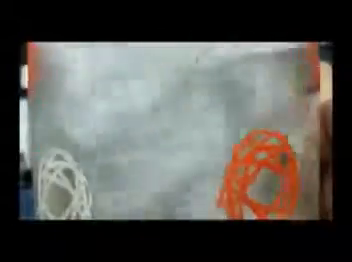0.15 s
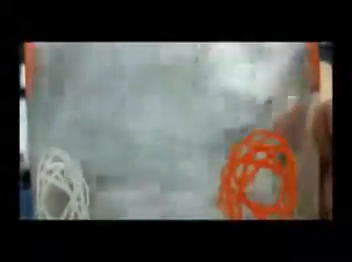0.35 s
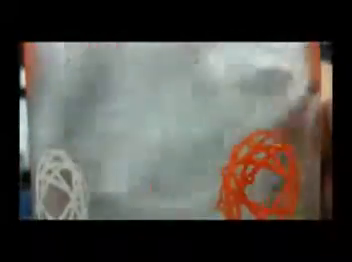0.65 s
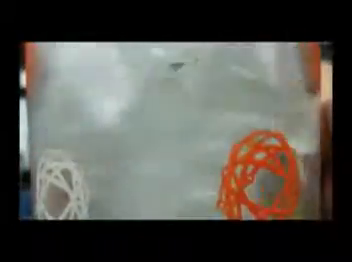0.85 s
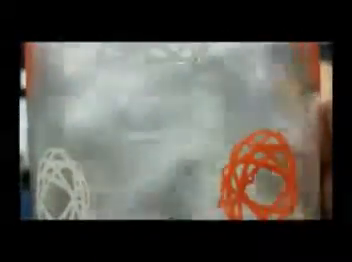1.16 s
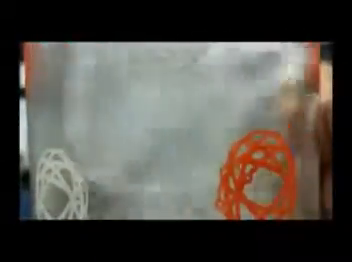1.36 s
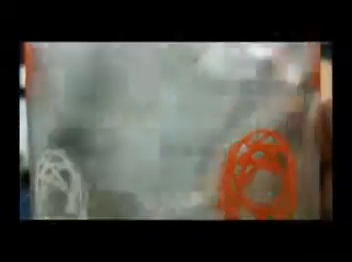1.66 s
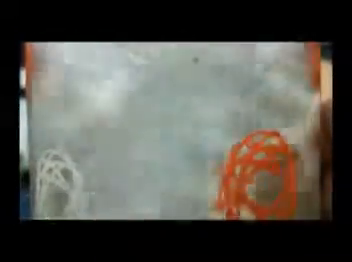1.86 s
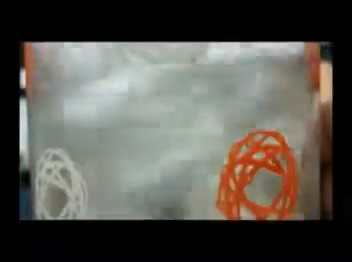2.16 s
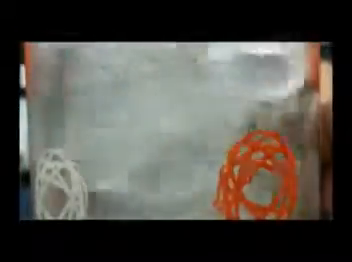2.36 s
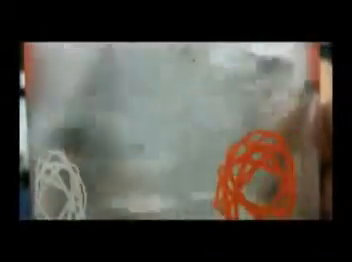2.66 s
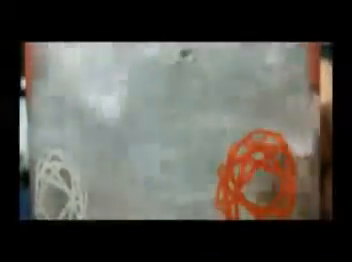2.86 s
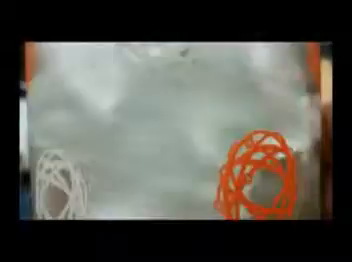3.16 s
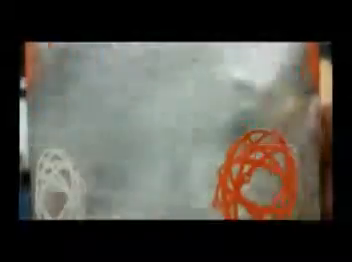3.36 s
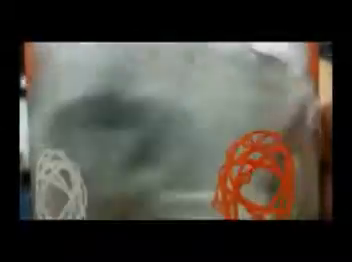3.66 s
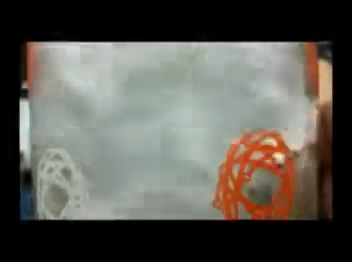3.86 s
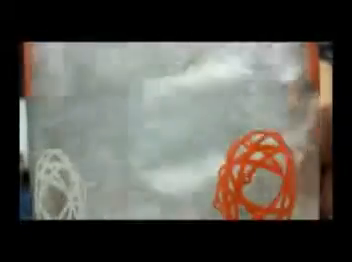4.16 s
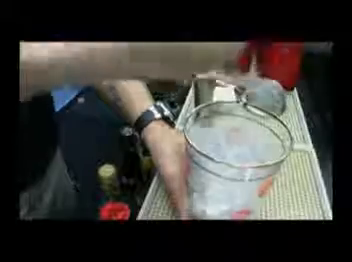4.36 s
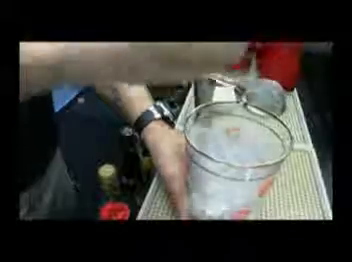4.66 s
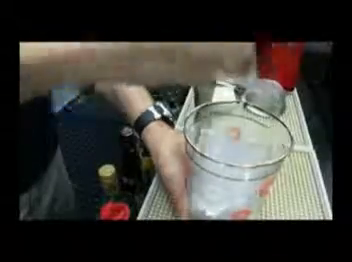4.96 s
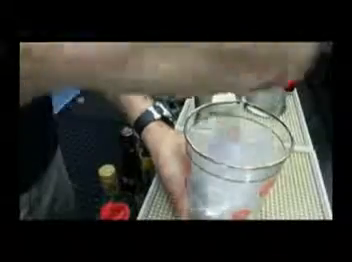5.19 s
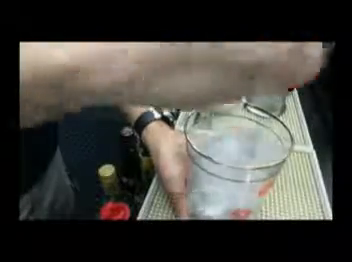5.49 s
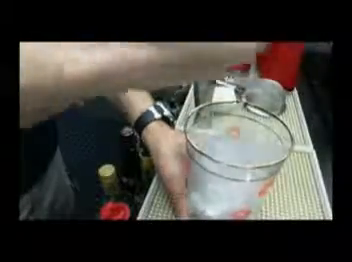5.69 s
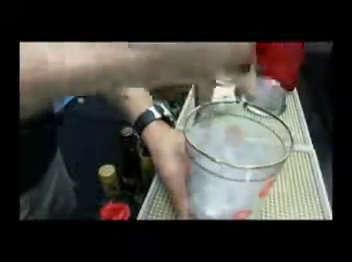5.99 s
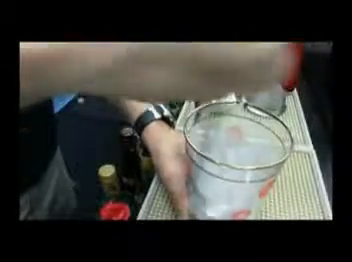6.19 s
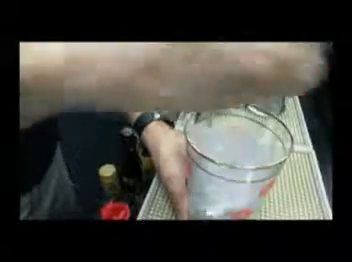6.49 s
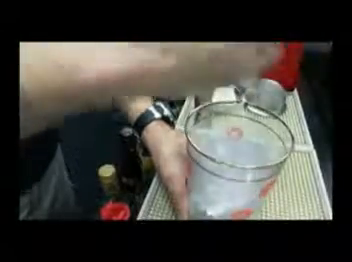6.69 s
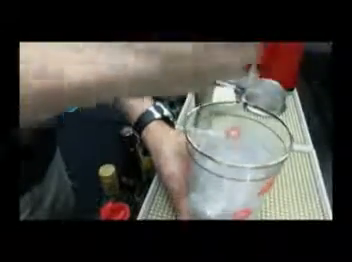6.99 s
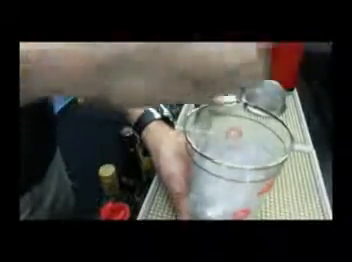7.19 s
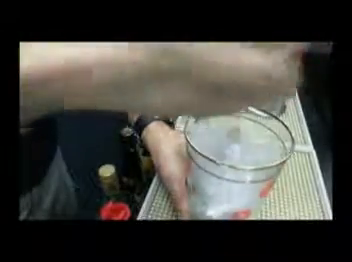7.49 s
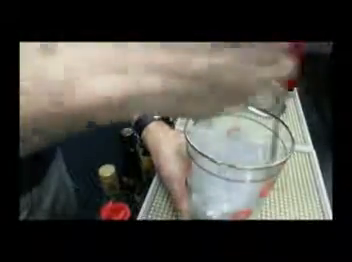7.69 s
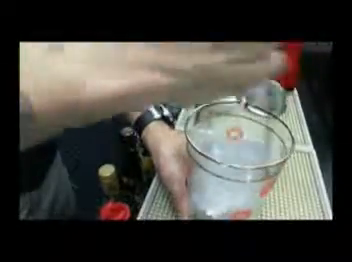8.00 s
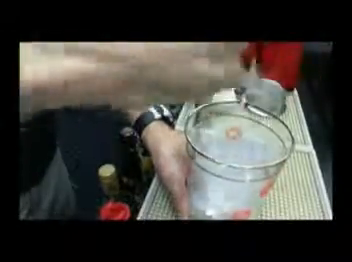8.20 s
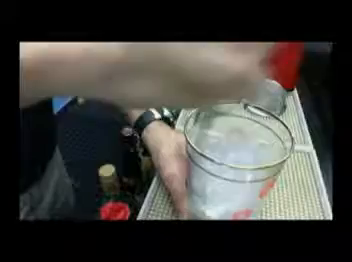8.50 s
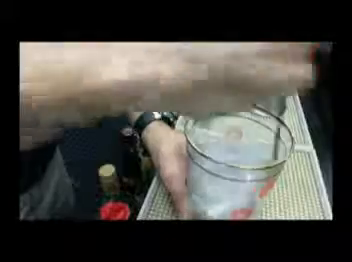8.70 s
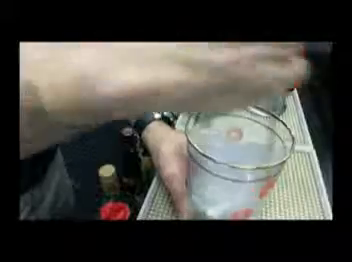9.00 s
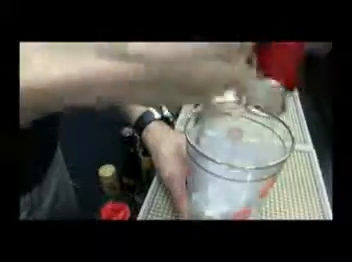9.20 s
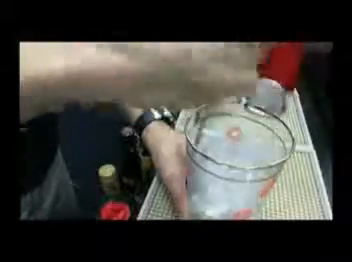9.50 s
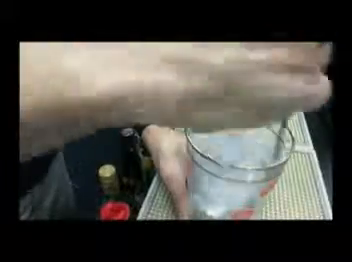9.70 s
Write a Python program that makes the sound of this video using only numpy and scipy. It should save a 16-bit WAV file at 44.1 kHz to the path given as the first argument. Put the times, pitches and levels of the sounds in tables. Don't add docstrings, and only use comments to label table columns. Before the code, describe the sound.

From 0 to about 4.2 seconds, ice is stirred briskly in a tall mixing glass right beside a small microphone. Sharp, bright cracks come in crowded clusters, roughly two bursts each second, over continuous fine wet rattling, hollow glass thuds and a low slosh of liquid. The hardest hits distort and sound flattened; a heavy cluster lands around 4.1 to 4.2. A blink of silence follows at about 4.26, then a loud clipped crack as the sound resumes from farther off at 4.3. The stirring is now quieter and slower, with more short, hard room reverberation and a steady low counter hum. Clear single cracks stand out near 5.0, 5.7, 7.0, 8.5 and 9.5 among faint ticks and dull taps. A deep sway swells at 5.4 and fades, returning weaker at 8.2. Stirring continues to the end, near 10 seconds.

```python
import sys
import numpy as np
from scipy import signal
from scipy.fft import rfft, irfft
from scipy.io import wavfile
from scipy.ndimage import uniform_filter1d

SR = 44100
rng = np.random.default_rng(int(sys.argv[2]) if len(sys.argv) > 2 else 0)


def to_linear_factor(level_db):
    exponent = np.asarray(level_db, float) / 20
    return 10 ** exponent


def store_pcm(level_fs):
    pcm = np.round(np.clip(level_fs, -1, 1) * 32767).astype(np.int16)
    wavfile.write(sys.argv[1], SR, np.atleast_2d(pcm).T)


N = 434385

# start_s, end_s
CHANGE = (4.2568, 4.3162)


def evened(x):
    return x / np.sqrt(np.mean(x ** 2) + 1e-20)


def read(points, hz):
    point_hz, value = np.transpose(points)
    return np.interp(np.log(hz + 1), np.log(point_hz + 1), value)


def colour(points, size=2048):
    gain_db = read(points, abs(np.fft.fftfreq(size, 1 / SR)))
    log_gain = np.log(to_linear_factor(np.maximum(gain_db, -100)))
    return np.fft.ifft(np.exp(np.conj(signal.hilbert(log_gain)))).real[:size // 2]


def ring(x, hz, width):
    r = np.exp(-np.pi * width / SR)
    angle = 2 * np.pi * hz / SR
    return signal.lfilter([np.sin(angle)], [1, -2 * r * np.cos(angle), r * r], x)


def counter():
    # start_s, level_db, decay_db_per_s
    jolts = [
        (4.32, -50.5, 44),
        (5.36, -28.5, 14),
        (8.19, -36.5, 13),
        (9.25, -47, 10),
    ]
    # mode_hz, width_hz, level_db
    modes = [
        (133, 5.2, -48),
        (172.3, 4.5, -46),
        (235.5, 9, -47.5),
    ]
    sway_hz, rise_s, stop_s = 33.7, 0.035, 1.4
    t = np.arange(N) / SR
    after = t > CHANGE[1]
    sway = to_linear_factor(-41.5) * after
    for s, db, dying_db in jolts:
        gate = np.clip(np.minimum(t - s, s + stop_s - t) / rise_s, 0, 1)
        sway = sway + to_linear_factor(db - dying_db * abs(t - s)) * gate
    murmur = sum(to_linear_factor(db) * evened(ring(rng.standard_normal(N), hz, width)) for hz, width, db in modes)
    return sway * np.sqrt(2) * np.sin(2 * np.pi * sway_hz * t) + murmur * after


def stir_db():
    # start_s, level_db
    vigour = [(0.0, -36), (1.07, -34), (1.18, -38), (1.48, -32), (1.97, -34), (2.14, -33.5), (4.03, -35),
              (4.39, -36.5), (5.16, -38.5), (7.3, -41.5), (8.61, -39.5), (9.03, -40), (9.85, -39)]
    s, db = np.transpose(vigour)
    return np.interp(np.arange(N) / SR, s, db)


def slosh_db():
    vigour_db = stir_db()
    far_db = -6 * (np.arange(N) > CHANGE[1] * SR)
    return -23.5 + 0.69 * (vigour_db - vigour_db[0]) + far_db


def slosh():
    # frequency_hz, density_db
    spectrum = [(12, -42), (20, -25), (34, -3), (49, -1.5), (76, -10.5), (487, -15), (608, -65), (776, -18),
                (4000, -37), (5200, -74), (8800, -120)]
    gain = to_linear_factor(read(spectrum, np.fft.rfftfreq(N + 1, 1 / SR)))
    wash = evened(irfft(rfft(rng.standard_normal(N + 1)) * gain)[:N])
    deep = signal.filtfilt(*signal.butter(2, 80, fs=SR), wash)
    far = np.arange(N) > CHANGE[0] * SR
    return to_linear_factor(slosh_db() - 10.0) * (wash - 0.68 * deep * far)


def tail(size=16000):
    # frequency_hz, t60_s
    decay = [
        (300, 0.3),
        (2500, 0.71),
        (5000, 0.14),
        (14000, 0.42),
    ]
    taps = np.zeros(size)
    at = np.arange(130, size - 20, 12)
    taps[at + rng.integers(0, 12, len(at))] = rng.choice([-1., 1.], len(at))
    hz, t, z = signal.stft(taps, SR, nperseg=256)
    dull = to_linear_factor(-8.0 * (hz < 4200))[:, None]
    fade = to_linear_factor(-60 * t / read(decay, hz)[:, None])
    faded = signal.istft(z * dull * fade, SR, nperseg=256)[1]
    return faded / np.linalg.norm(faded)


def room(x):
    turn = np.arange(N) / SR / 0.13
    wet = np.zeros(N)
    for k in range(3):
        share = np.cos(np.pi / 2 * np.minimum(abs((turn - k) % 3 - 1.5), 1))
        wet += signal.fftconvolve(x * share, tail())[:N]
    return wet


def glass(pushes):
    # mode_hz, width_hz, level_db
    modes = [
        (277, 360, 2.5),
        (618.6, 48, -2.5),
        (1516, 230, -1),
        (2074, 41, -17),
        (2260, 1900, -1),
    ]
    change = round(CHANGE[1] * SR)
    takes = []
    for part, pitch in ((pushes[:change], 1), (pushes[change:], 0.975)):
        rung = np.zeros(len(part))
        for k, (hz, width, db) in enumerate(modes):
            rung += (-1) ** k * to_linear_factor(db) * ring(part, hz * pitch, width * pitch ** 8)
        takes.append(rung)
    thud = signal.lfilter(*signal.butter(2, (130, 1700), "band", fs=SR), pushes)
    return np.concatenate(takes) + to_linear_factor(16.5) * thud


def crack_walls():
    # frequency_hz, level_db
    near = [(710, -14), (1200, -11), (1610, -20.5), (1730, -9.5), (2000, -4), (2230, -10.5), (2530, -3),
            (3320, -9.5), (5530, 1.5), (6440, -5), (8910, -0.5), (10100, -6.5), (11700, 0), (14400, -11.5),
            (16000, -27.5)]
    # frequency_hz, level_db
    distant = [(710, -16.5), (1500, -13), (2400, -5.5), (3400, -7), (4700, -0.5), (6000, -3.5), (7900, 0.5),
               (10000, -5), (12000, -2), (14400, -11), (16000, -41)]
    return colour(near), colour(distant)


def rattle(struck, per_s=450., spread_db=4.5, follow=0.32):
    busy = uniform_filter1d(uniform_filter1d(struck ** 2, 1500), 1500, origin=700)
    usual = abs(uniform_filter1d(busy, 30000))
    busy = evened(((abs(busy) + 1e-5) / (usual + 1e-5)) ** (follow / 2))
    drift = uniform_filter1d(uniform_filter1d(rng.standard_normal(N), 900), 900)
    clumps = to_linear_factor(2.5 * evened(drift))
    contact = rng.random(N) < per_s / SR
    size = clumps * to_linear_factor(spread_db * np.minimum(rng.exponential(1, N), 2)) * contact

    far = np.arange(N) > CHANGE[0] * SR
    walls = crack_walls()
    cube = rng.integers(0, 40, N) + 40 * far
    kinds = [crack(hz, 0.0018, wall, focus_db=12.0)
             for wall in walls for hz in np.geomspace(1900, 12500, num=40)]
    ticks = np.zeros(N + 1500)
    for at in np.flatnonzero(size):
        ticks[at:at + 1500] += size[at] * kinds[cube[at]]

    near_hiss, far_hiss = [signal.oaconvolve(rng.standard_normal(N), wall)[:N] for wall in walls]
    hiss = np.where(far, far_hiss, near_hiss)
    soft = uniform_filter1d(size, 60) * rng.standard_normal(N)
    bumps = glass(signal.lfilter(*signal.butter(2, 900, fs=SR), soft))
    fine = to_linear_factor(stir_db()) * (to_linear_factor(2.0) * busy * evened(ticks[:N]) + to_linear_factor(-13.0) * evened(hiss))
    return fine + busy * to_linear_factor(slosh_db() - 4.5) * evened(bumps)


def knocks():
    # start_s, level_db, thud_hz
    wall_knocks = [(.0346, -7, 1680), (.189, -5.5, 1070), (.4992, -13.5, 680), (.891, -17, 1450),
                   (1.1048, -10, 1390), (1.1457, -16.5, 1370), (1.2158, -18, 560), (1.446, -8.5, 960),
                   (1.4649, -10, 1490), (1.4953, -12, 1070), (1.811, -12, 1290), (2.015, -14.5, 613),
                   (2.892, -15, 625), (3.1733, -16, 1300), (3.212, -15.5, 553), (3.3485, -18, 1330),
                   (3.4112, -11.5, 1080), (3.7599, -14, 1730), (3.7758, -9, 1700), (3.8622, -15.5, 1170),
                   (4.1345, -6.5, 750), (4.1604, -14, 736), (4.1926, -14, 960), (4.6405, -22, 660),
                   (6.2347, -15.5, 630), (7.5578, -23.5, 600)]
    # start_s, level_db
    taps = [(4.9447, -21), (5.244, -16), (5.2541, -20), (5.2597, -18), (5.5882, -21), (5.9306, -23),
            (6.5758, -17), (6.6004, -21), (8.1901, -23), (8.8288, -25), (8.9518, -26), (9.048, -21.5),
            (9.1341, -24.5), (9.1661, -21.5), (9.3038, -23.5), (9.7092, -23), (9.8136, -16)]
    # start_s, level_db
    nudges = [(0.162, -14), (0.545, -7), (0.823, -7), (1.055, -11), (1.543, -10), (1.727, -2.5),
              (1.822, -6), (2.241, -16), (2.389, -3.5), (2.458, -9), (2.564, -15), (2.621, -12),
              (2.821, -8), (3.256, -14.5), (3.353, -9.5), (3.528, -15), (3.912, -9.5), (3.993, -19.5),
              (4.457, -18.5), (4.498, -23), (4.616, -9.5), (4.929, -15.5), (4.967, -10), (5.467, -17),
              (6.036, -15), (6.286, -20.5), (6.511, -22), (7.017, -16.5), (7.343, -21.5), (7.388, -24),
              (7.504, -21), (8.215, -18.5), (8.413, -21.5), (8.585, -21.5), (8.733, -22.5), (8.879, -21.5),
              (9.257, -16), (9.427, -24), (9.806, -9.5), (9.841, -24)]
    tap_hz = 1450
    pushes, thuds, step = np.zeros(N + 900), np.zeros(N + 900), np.arange(900)
    for s, db, hz in wall_knocks + [(s, db, tap_hz) for s, db in taps]:
        at = round(s * SR)
        push = rng.standard_normal(900) * np.exp(-step / 234.0) * np.minimum(step / 12.0, 1)
        thud = ring(push, hz, 290.0)
        pushes[at:at + 900] += to_linear_factor(db - 26.5) * evened(push)
        thuds[at:at + 900] += to_linear_factor(db) * thud / abs(thud).max()
    for s, db in nudges:
        at = round(s * SR)
        push = rng.standard_normal(900) * np.exp(-step / 81.0)
        thud = ring(push, tap_hz, 720.0) + ring(push, 2480, 330.0)
        pushes[at:at + 900] += to_linear_factor(db - 34.0) * evened(push)
        thuds[at:at + 900] += to_linear_factor(db - 6.0) * thud / abs(thud).max()
    return thuds[:N] + glass(pushes[:N])


def crack(hz, chatter_s, wall, focus_db=5.5, grit_db=-43.0, size=1500):
    t = np.arange(size) / SR
    decay = np.exp(-(t / (1.276 * chatter_s)) ** 0.84)
    chatter = rng.standard_normal(size) * decay * np.minimum(t / 0.0012, 1)

    modes_hz = np.append(hz, rng.uniform(2130, 15050, 34))[:, None]
    t60_s = np.append(0.01, rng.uniform(0.0049, 0.0053, size=34))[:, None]
    chance_db = np.append(6, rng.normal(0, 4.1, size=34))[:, None]
    distance_db = focus_db * abs(np.log2(modes_hz / hz))
    small_db = 7.7 * (modes_hz < 4100) * (hz > 4100)
    heights = to_linear_factor(chance_db - distance_db - small_db)
    ring_t = t[:600]
    modes = (heights * np.sin(2 * np.pi * modes_hz * ring_t) * to_linear_factor(-60 * ring_t / t60_s)).sum(0)

    rung = evened(signal.fftconvolve(chatter, modes)[:size]) + to_linear_factor(grit_db) * evened(chatter)
    sound = signal.fftconvolve(rung, wall)[:size]
    return sound / np.sqrt(uniform_filter1d(sound ** 2, 60).max())


def strikes():
    # start_s, level_db, ring_hz
    cube_strikes = [(0.0067, -7.5, 10800), (0.0137, -3, 11500), (0.032, -8, 10600), (0.0344, 2, 7960),
                    (0.0514, -7, 2110), (0.1137, -4, 8150), (0.132, -3.5, 4630), (0.172, -8, 5770),
                    (0.1885, 3.5, 3540), (0.198, -3, 8530), (0.2318, -11, 2540), (0.261, -15, 7200),
                    (0.292, -17, 5400), (0.3006, -7, 5550), (0.3508, -12, 5700), (0.3582, -1.5, 11700),
                    (0.3949, -22, 5270), (0.4182, -14, 5230), (0.431, -5.5, 12100), (0.4463, -31, 2410),
                    (0.482, -12.5, 5250), (0.4972, -14, 5440), (0.5034, 3.5, 8070), (0.5182, -2, 5440),
                    (0.527, -11, 4500), (0.545, -1.5, 7440), (0.556, -11, 5510), (0.5846, -15.5, 2330),
                    (0.675, -14, 12080), (0.693, -2.5, 11100), (0.7063, -11, 5260), (0.7336, -10, 8660),
                    (0.743, -7.5, 2420), (0.7529, 1, 11900), (0.7698, -7, 4500), (0.782, -6, 4460),
                    (0.79, -19, 5200), (0.7962, -5, 4770), (0.806, -12, 5770), (0.815, -8, 5190),
                    (0.821, -7, 8240), (0.8361, -4.5, 12100), (0.871, 0, 5400), (0.8881, -7, 2600),
                    (0.9446, -8, 7650), (0.9995, -10.5, 5640), (1.004, -14, 2550), (1.025, -16.5, 2380),
                    (1.04, -9.5, 12300), (1.065, -15, 6660), (1.08, -12, 2070), (1.093, -16, 4650),
                    (1.105, -11, 3070), (1.114, -12, 8120), (1.12, -8, 8050), (1.146, -1.5, 5100),
                    (1.1753, -15, 4480), (1.2167, -0.5, 12400), (1.2286, -22, 2420),
                    (1.3648, -16.5, 2470), (1.3729, -3, 5740), (1.3884, -14, 4460), (1.4268, -25, 2020),
                   (1.4463, -2.5, 5670), (1.463, -5.0, 11800), (1.4694, 4, 4640), (1.477, -6, 4720),
                   (1.485, -9, 5320), (1.4953, -8, 2500), (1.5007, -3.0, 4430), (1.5132, -26, 4520),
                   (1.5338, -3.5, 12900), (1.559, -15.5, 8700), (1.6174, -13.5, 2800), (1.7055, -4, 5630),
                   (1.7146, -9, 11500), (1.721, -10, 2100), (1.727, -1.5, 9300), (1.7386, -5, 4400),
                   (1.76, -8.5, 3120), (1.7841, -11, 5990), (1.794, -10, 6890), (1.812, -7, 4570),
                   (1.821, -3, 5030), (1.8608, -6, 2620), (1.8862, -0.5, 4670), (1.894, 0.5, 8500),
                   (1.9267, -14, 4570), (1.9453, -9.5, 4440), (1.9647, -11, 10850), (1.9706, -19, 7640),
                   (1.987, -3.5, 11300), (2.011, -9, 9350), (2.015, -6.5, 5700), (2.0237, 5, 5900),
                   (2.0371, -2, 5600), (2.0425, -4, 5900), (2.055, 4, 8000), (2.0774, -4, 12510),
                   (2.093, -0.5, 9200), (2.1278, -0.5, 5700), (2.14, -15, 5470), (2.15, -5.5, 5470),
                   (2.232, -11.5, 8870), (2.2724, -17, 7100), (2.288, -18, 4410), (2.3004, -11.5, 9100),
                   (2.308, -3.5, 13700), (2.322, -17, 13240), (2.368, -4.5, 5700), (2.3727, 2.5, 8100),
                   (2.3857, 4.5, 5340), (2.4038, -13, 5700), (2.4234, -1, 9150), (2.4326, -6.5, 8400),
                   (2.459, -7, 6220),
                    (2.489, -11.5, 5300), (2.494, -13, 11520), (2.5285, -13, 4820), (2.5395, -1, 5640),
                       (2.547, -8, 6900), (2.6014, -8.5, 8850), (2.6968, -2.5, 8200), (2.708, -10, 4700),
                       (2.717, 7, 11400), (2.7335, 3, 5700), (2.7636, -9.5, 8700), (2.82, -15, 5170),
                       (2.8933, -21, 4530), (2.9608, -24, 12000), (3.02, -6.5, 8800), (3.029, -6, 9400),
                       (3.0826, -12.5, 11600), (3.0955, -16.5, 2560), (3.1545, -15, 11800),
                       (3.1607, -5, 12200), (3.1735, -9, 5600), (3.181, -6.5, 8140), (3.1852, -3, 5850),
                       (3.195, -9, 5540), (3.211, -21, 5230), (3.224, -9.5, 5100), (3.2313, -11.5, 4740),
                       (3.318, -18, 5680), (3.3506, -9, 8750), (3.3733, -14, 8500), (3.3789, -17, 13480),
                       (3.3922, -8.5, 4840), (3.401, -12, 5900), (3.409, -4, 11400), (3.4253, -17.5, 8910),
                       (3.436, -4, 8600), (3.4435, -10, 4930), (3.451, -12, 2710), (3.496, -14, 7820),
                       (3.5035, -6, 5170), (3.5185, -5.5, 5400), (3.5488, -15.5, 5600),
                       (3.618, -1.5, 11000), (3.6343, -4.5, 5630), (3.648, -3, 9400), (3.6586, -9, 8900),
                       (3.6716, -20, 10810), (3.6787, -9.5, 7500), (3.727, -10.5, 4550), (3.749, -11, 6100),
                       (3.7586, -1.5, 5320), (3.7702, -4, 5650), (3.7753, 6.5, 4360), (3.8152, -20, 11600),
                       (3.855, 6, 5330), (3.912, -12, 9400), (3.9236, -9, 2660), (3.9342, 1, 6200),
                       (3.944, -14, 11000),
                    (3.971, -13.0, 5700), (3.9854, -6, 9200), (4.0336, -5.5, 11300), (4.0851, 1.5, 8770),
                       (4.0962, -5, 8550), (4.1164, 4, 5530), (4.1228, -5, 11100), (4.1349, 6, 5800),
                       (4.153, -13, 5990), (4.1658, -13, 2460), (4.1802, -2, 11740), (4.1968, 8, 8200),
                       (4.2102, -1.5, 5900), (4.2151, -10, 7880), (4.3561, -16, 5770), (4.4012, -21, 4810),
                       (4.41, -12, 5200), (4.4331, -17, 7240), (4.484, -20.5, 8200), (4.56, -18.5, 7500),
                       (4.5694, -14, 4440), (4.6168, -9, 7200), (4.6615, -24, 4530), (4.6744, -11.5, 4800),
                       (4.7101, -12.5, 9100), (4.7343, -11.5, 5000), (4.7977, -17, 4200),
                       (4.8044, -20, 4290), (4.8352, -24, 8050), (4.8677, -14.5, 5030), (4.9293, -11, 4660),
                       (4.9633, -12.5, 4700), (4.982, -14, 4750), (4.999, -17, 4240), (5.0353, 3.5, 8780),
                       (5.0509, -11, 2640), (5.0835, -19, 6360), (5.123, -10.5, 5060), (5.2163, -25, 6000),
                       (5.2419, -12, 4960), (5.2538, -17, 4570), (5.2577, -12, 2360), (5.294, -10, 3780),
                       (5.3346, -19, 7730), (5.3452, -6, 4430), (5.3531, -12, 7900), (5.36, -14.5, 2430),
                       (5.3698, -14, 2320), (5.4082, -9, 6540), (5.4378, -13.5, 3000), (5.4487, -22, 2750),
                       (5.4666, -13, 2850), (5.5451, -8.5, 4500), (5.5542, -20, 7920),
                       (5.5814, -11.5, 5050), (5.5874, -13, 4700), (5.637, -13, 6500), (5.6846, -0.5, 5060),
                    (5.7407, -12, 6160), (5.8275, -12.5, 7150), (5.8657, -20.5, 4040), (5.947, -18.5, 2300),
                  (5.9995, -5.5, 4950), (6.009, -23, 4910), (6.06, -11.5, 7140), (6.0904, -9.5, 4500),
                  (6.1238, -17.5, 11300), (6.2365, -22.5, 8720), (6.2496, -21, 2630), (6.2865, -23, 8980),
                  (6.2934, -26, 4530), (6.3194, -15, 4620), (6.331, -21, 2990), (6.3353, -17.5, 2090),
                  (6.347, -15, 4600), (6.4097, -16, 2740), (6.4172, -26, 8070), (6.4403, -18.5, 4700),
                  (6.468, -20, 4300), (6.5197, -21, 2480), (6.563, -18, 4520), (6.5756, -23, 2390),
                  (6.6002, -17, 2840), (6.6135, -20.5, 8100), (6.6624, -10.5, 4500), (6.7072, -23, 4450),
                  (6.7315, -21, 2670), (6.7408, -21.5, 2660), (6.7475, -14.5, 4870), (6.824, -20.0, 7650),
                  (6.8852, -8.5, 5600), (6.928, -22, 8500), (6.967, -22, 2580), (6.991, -3.5, 8800),
                  (7.061, -21, 2620), (7.0695, -24.5, 2520), (7.0764, -11.5, 5800), (7.1975, -21.5, 2500),
                  (7.218, -22.5, 8200), (7.2623, -25.0, 7950), (7.3034, -22.5, 4630), (7.3271, -19.5, 5300),
                  (7.3695, -21, 7950), (7.3963, -22, 2620), (7.4035, -11, 4900), (7.4463, -22.5, 4390),
                  (7.488, -23, 4080), (7.5216, -19.5, 8200), (7.5419, -22, 8250), (7.6217, -26.5, 2390),
                  (7.633, -23, 5230), (7.6844, -21, 5940),
                    (7.7052, -14.5, 4900), (7.744, -17, 7350), (7.8156, -21.5, 3500), (7.8255, -23.0, 8440),
                  (7.8456, -28, 7150), (7.8914, -31, 2350), (7.938, -22, 2500), (7.9395, -20.5, 6050),
                  (8.0244, -24, 7450), (8.1105, -20.5, 5000), (8.16, -21.5, 5120), (8.2006, -15.5, 8800),
                  (8.2216, -25, 8120), (8.3095, -24, 1950), (8.3332, -36, 6840), (8.3576, -29, 7250),
                  (8.4137, -18.5, 6800), (8.497, -7, 5300), (8.6288, -23.5, 8250), (8.66, -26.5, 8900),
                  (8.7306, -23.5, 11600), (8.8286, -21, 2470), (8.8996, -19.5, 2420), (8.932, -24, 8510),
                  (8.951, -14, 7700), (8.9697, -24, 8120), (8.973, -18, 2280), (8.9933, -11.5, 9040),
                  (9.0478, -9.5, 7600), (9.1544, -10.5, 5200), (9.162, -19, 11300), (9.1954, -23, 2890),
                  (9.2166, -21.5, 8250), (9.2437, -21.5, 2260), (9.2726, -19.5, 5140), (9.3042, -20, 2230),
                  (9.3376, -13.5, 7350), (9.3545, -13, 7500), (9.476, -2.5, 8300), (9.4878, -11, 6040),
                  (9.6133, -15, 2420), (9.6273, -21, 2280), (9.638, -14, 3600), (9.6551, -19, 4600),
                  (9.722, -21, 7800), (9.7704, -5.5, 5100), (9.7963, -24, 4870), (9.8133, -15, 4830)]
    # start_s, level_db, ring_hz
    swallowed = [
        (4.296, 8, 5600),
    ]
    turns = (cube_strikes + swallowed)
    cracks, pushes, walls = np.zeros(N + 3000), np.zeros(N + 3000), crack_walls()
    for s, db, hz in turns:
        at = round(s * SR)
        chatter_s = min(0.0029 * to_linear_factor(0.2 * db), 0.0028)
        wall = walls[int(s > CHANGE[0])]
        sound = to_linear_factor(db - 2.0) * crack(hz, chatter_s, wall, focus_db=max(3.5 - 0.22 * db, 0))
        cracks[at:at + 1500] += sound
        pushes[at:at + 1500] += sound * (4000 / hz) ** 0.1
    return cracks[:N] + to_linear_factor(-21.5) * glass(pushes[:N])


def scene():
    struck = strikes() + knocks()
    ice = struck + rattle(struck)
    wet_db = np.where(np.arange(N) < CHANGE[0] * SR, -11.5, -7.0)
    mono = ice + to_linear_factor(wet_db) * room(ice) + slosh() + counter()
    return np.array([mono, mono])


def duck(x):
    above_db, share, most_db = 15., 0.8, 11.
    treble = signal.filtfilt(*signal.butter(2, 900, "high", fs=SR), x)
    now_db, ahead_db = (10 * np.log10(abs(uniform_filter1d(treble ** 2, size)) + 1e-9)
                        for size in (40, 130))
    jump_db = np.roll(ahead_db, -150) - now_db
    dip_db = uniform_filter1d(np.clip(share * (jump_db - above_db), 0, most_db), size=30)
    return x - treble * (1 - to_linear_factor(-dip_db))


def thin_top(x):
    # lower_edge_hz, least_db
    bands = [
        (14130, -62),
        (14820, -52),
        (15500, -42),
    ]
    hz, t, z = signal.stft(x, SR, nperseg=1024, noverlap=768)
    for low_hz, least_db in bands:
        band = (hz >= low_hz) & (hz < low_hz + 690)
        weak = np.abs(z[band]).mean(0) < to_linear_factor(least_db - 12.0)
        z[hz >= low_hz] *= ~weak
    return signal.istft(z * (hz < 16190)[:, None], SR, nperseg=1024, noverlap=768)[1][:N]


def top_cut(x):
    return signal.sosfilt(signal.butter(12, 16180, fs=SR, output="sos"), x)


def record(dry):
    t = np.arange(N) / SR
    overloaded = np.clip(duck(dry[0]) - 0.0855, -0.97, 0.93)
    held = thin_top(overloaded) * ((t < CHANGE[0]) | (t > CHANGE[1]))
    treble = signal.lfilter(*signal.butter(2, 1500, "high", fs=SR), held)
    wander = np.repeat(rng.standard_normal(N // 1024 + 1), 1024)[:N]
    side = to_linear_factor(-30.0) * treble * wander
    return top_cut(np.clip([held + side, held - side], -1, 1))


dry = scene()
out = record(dry)
store_pcm(out)
```